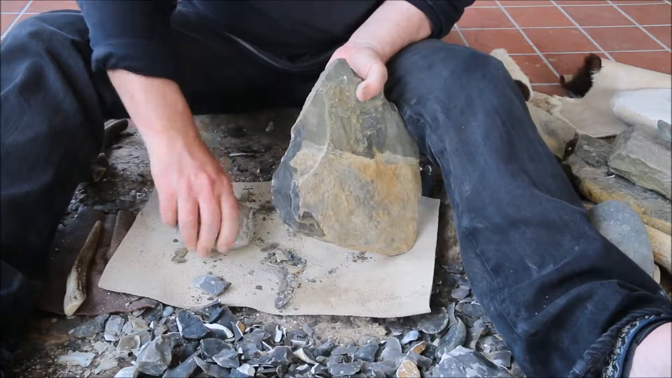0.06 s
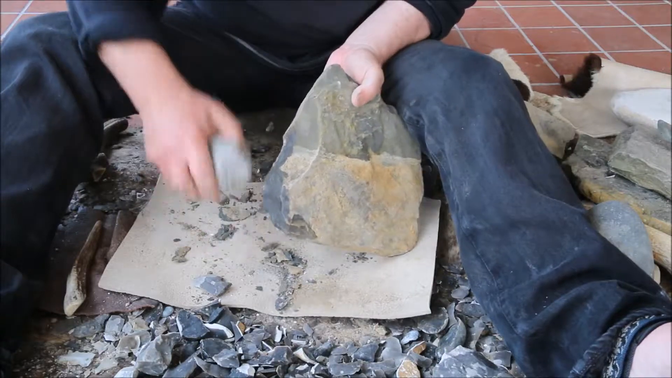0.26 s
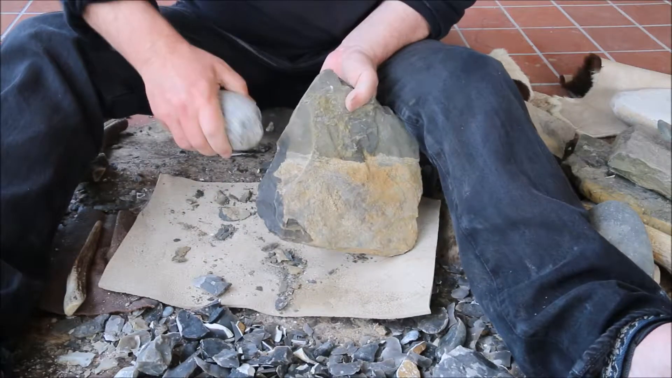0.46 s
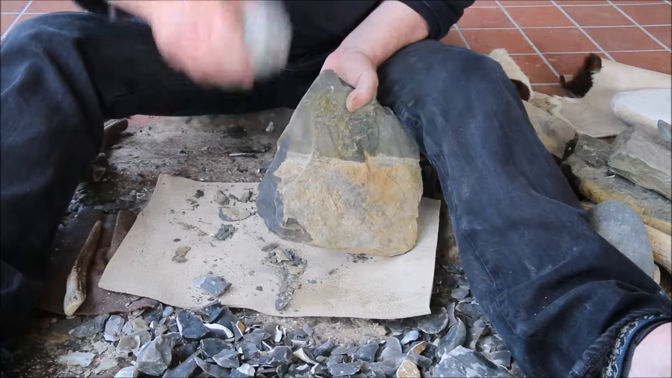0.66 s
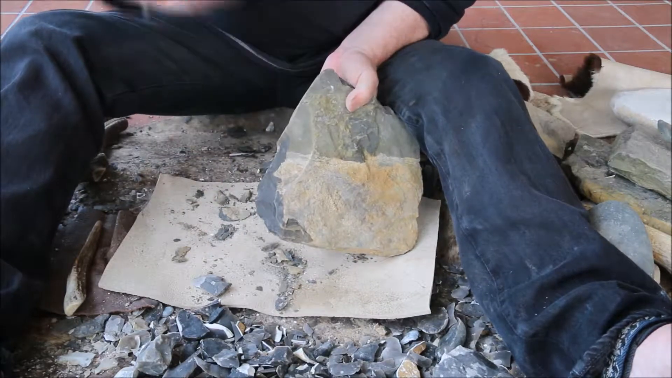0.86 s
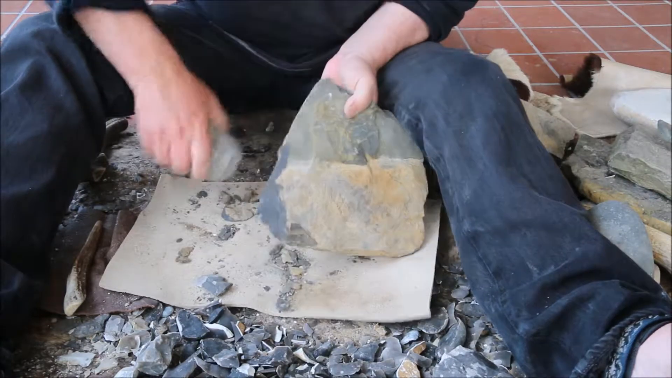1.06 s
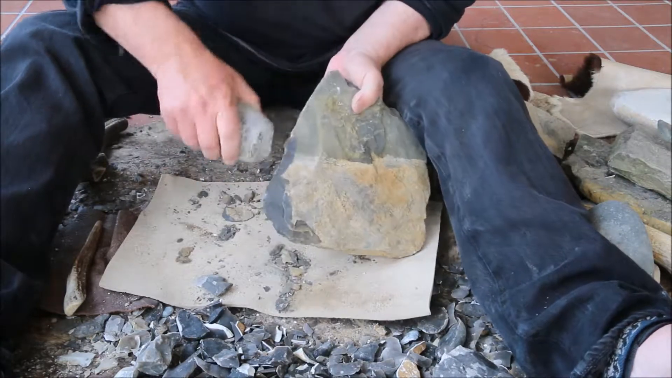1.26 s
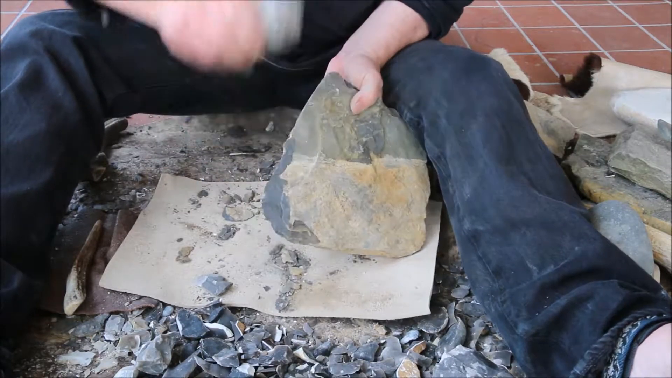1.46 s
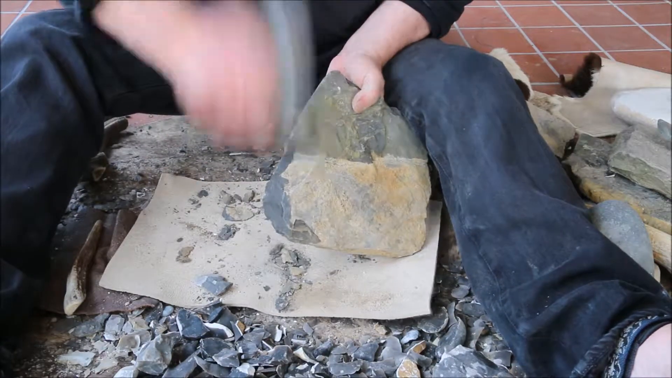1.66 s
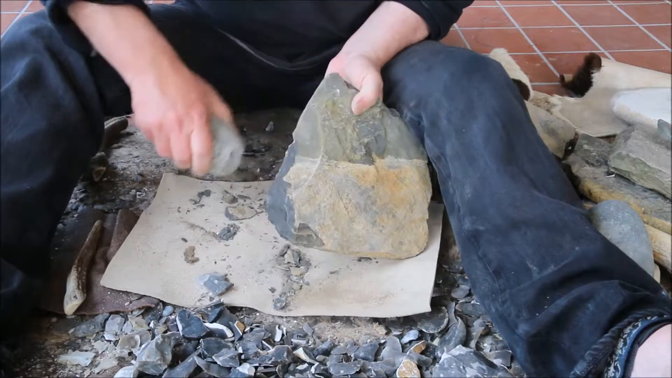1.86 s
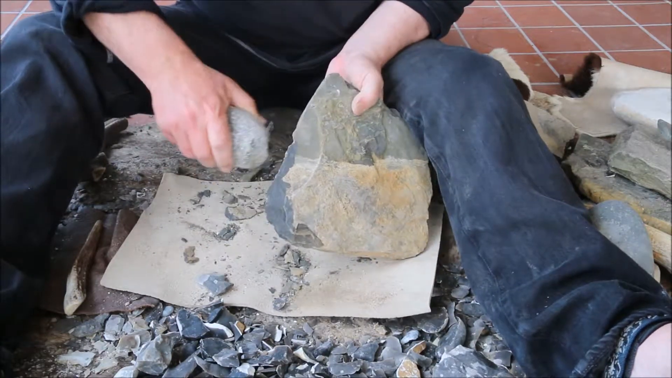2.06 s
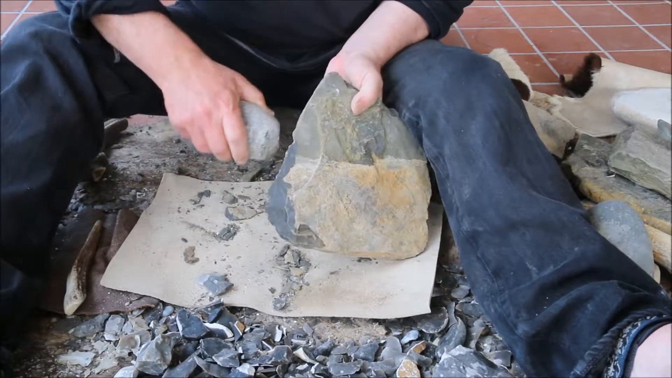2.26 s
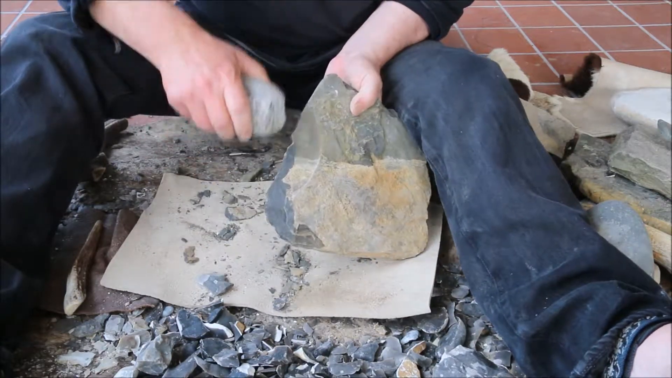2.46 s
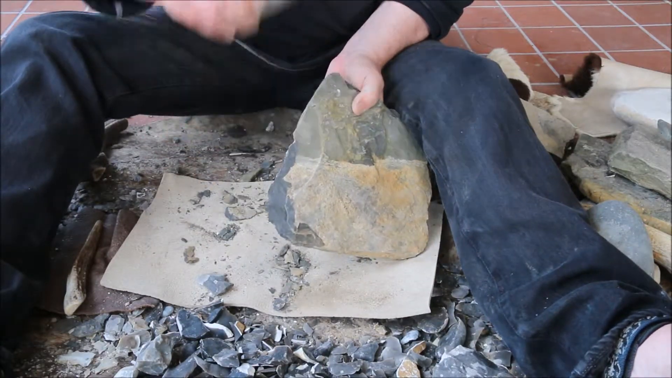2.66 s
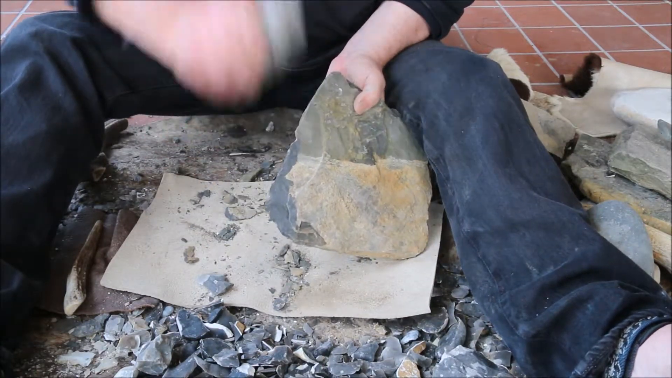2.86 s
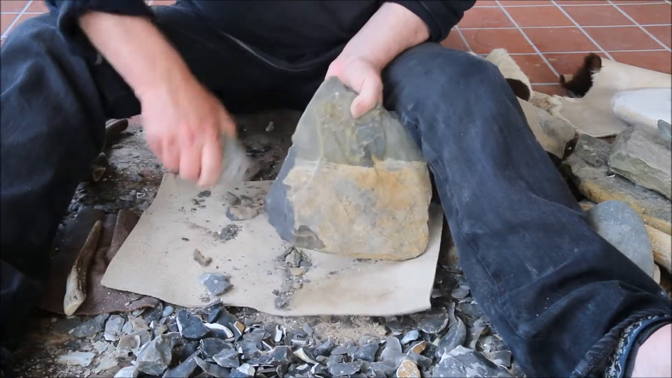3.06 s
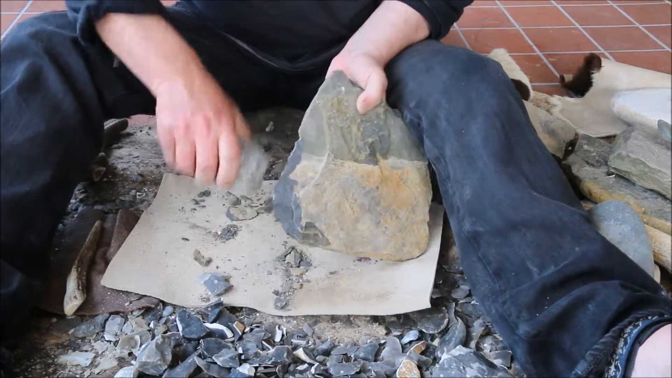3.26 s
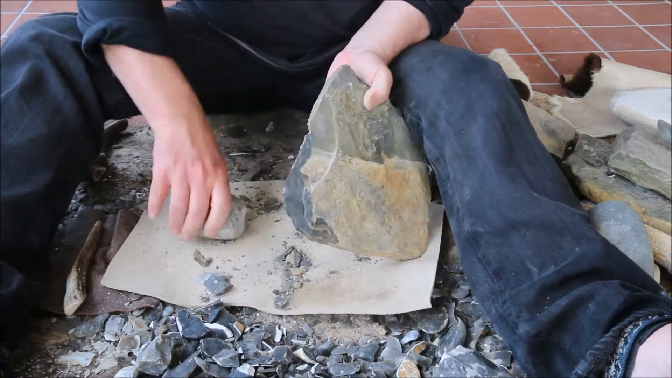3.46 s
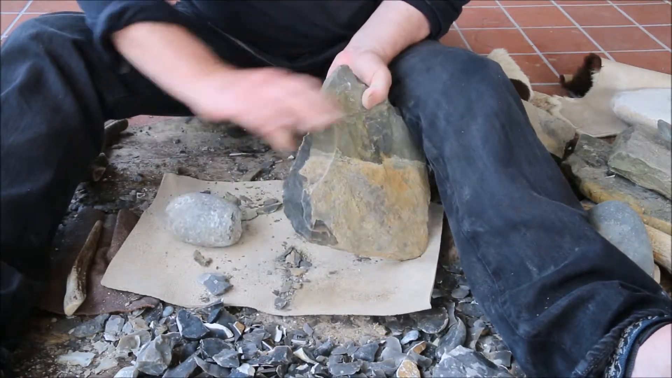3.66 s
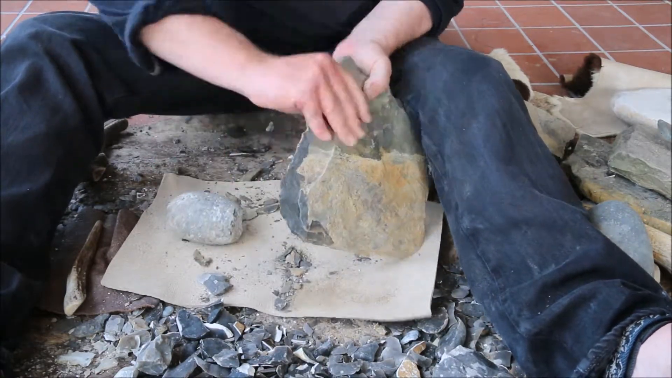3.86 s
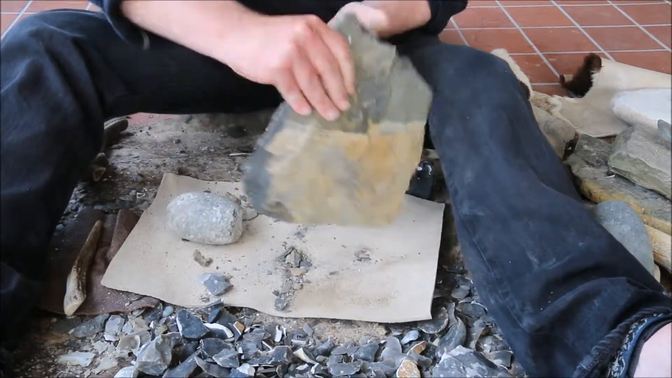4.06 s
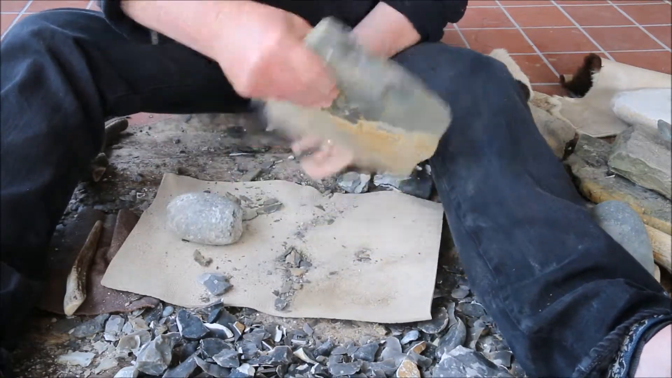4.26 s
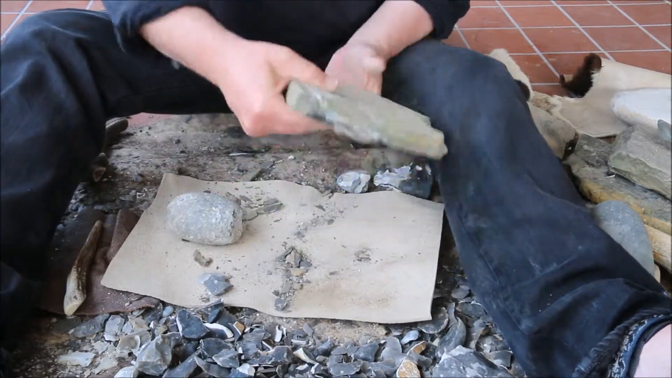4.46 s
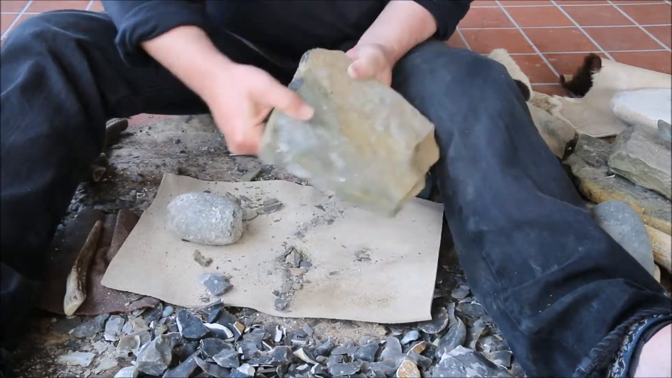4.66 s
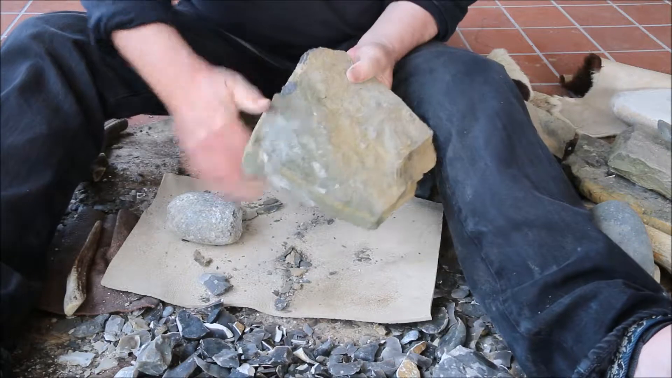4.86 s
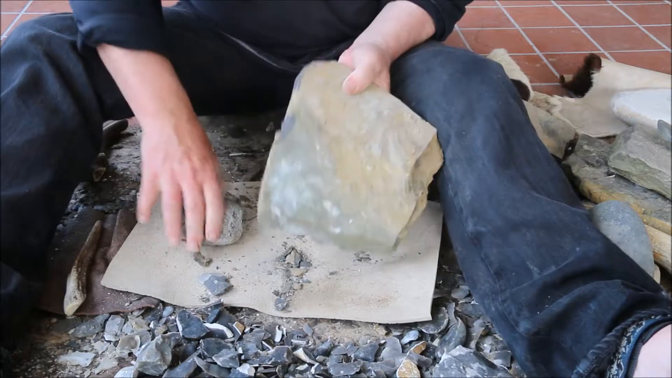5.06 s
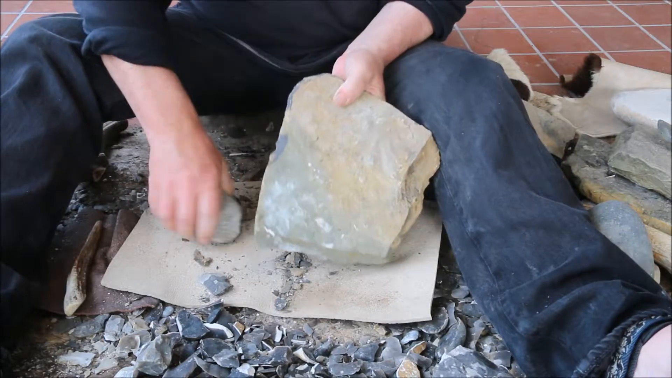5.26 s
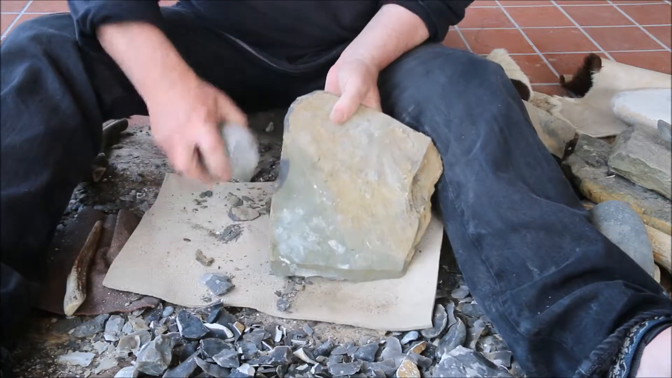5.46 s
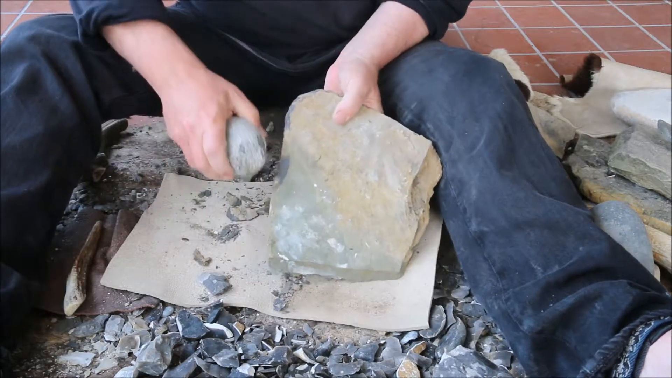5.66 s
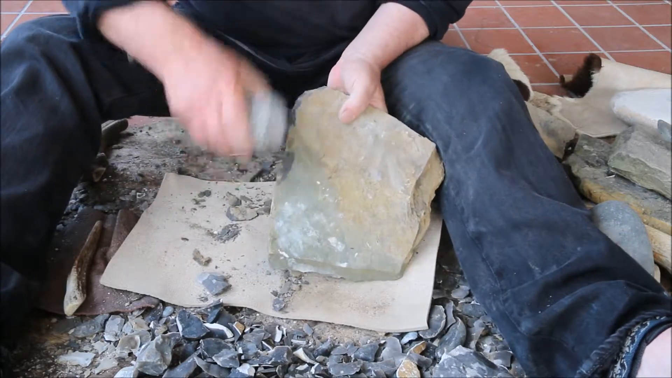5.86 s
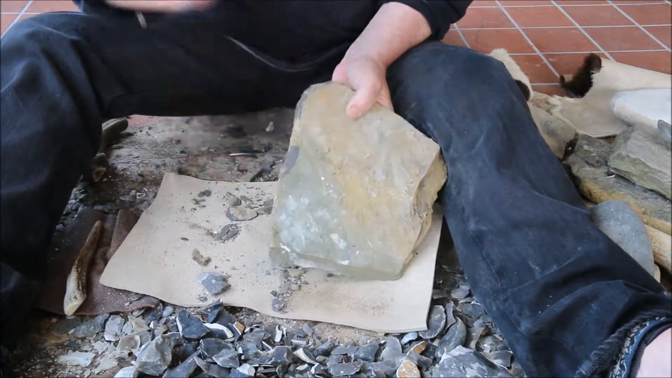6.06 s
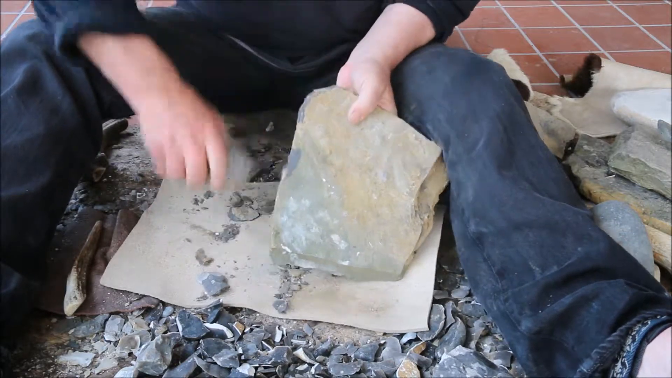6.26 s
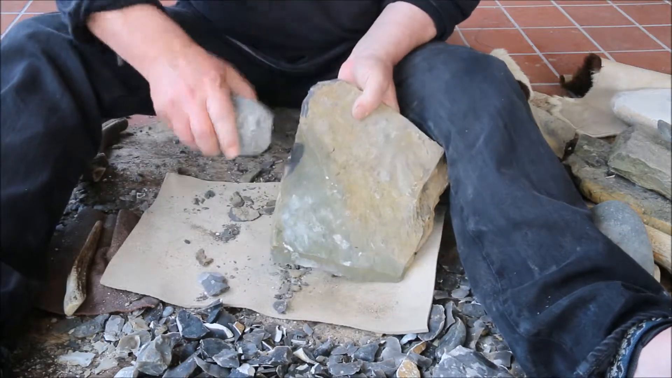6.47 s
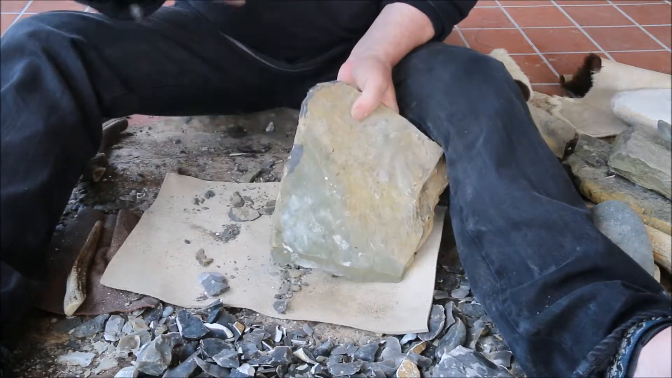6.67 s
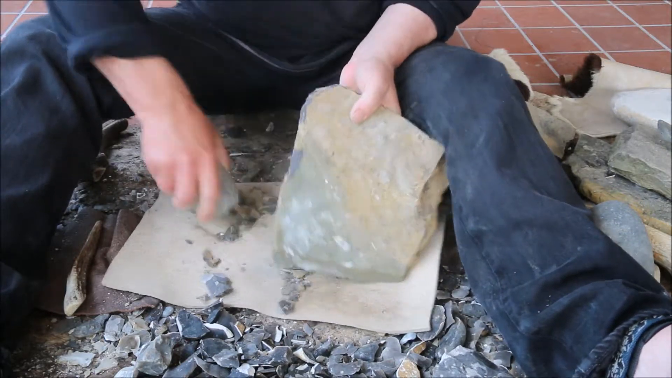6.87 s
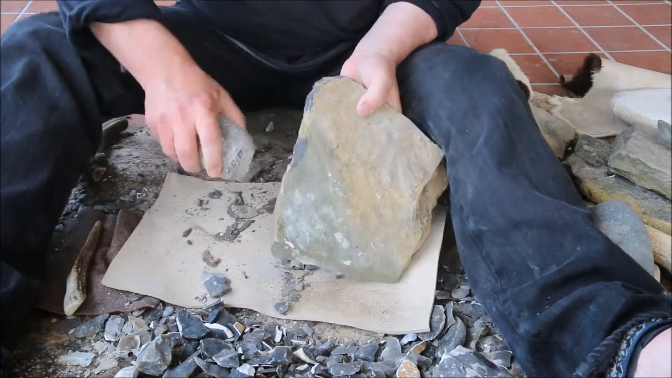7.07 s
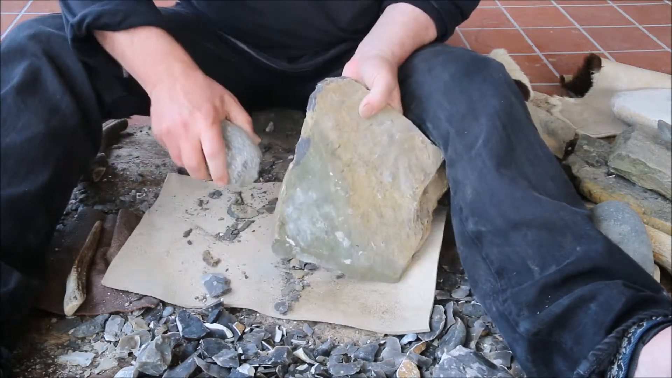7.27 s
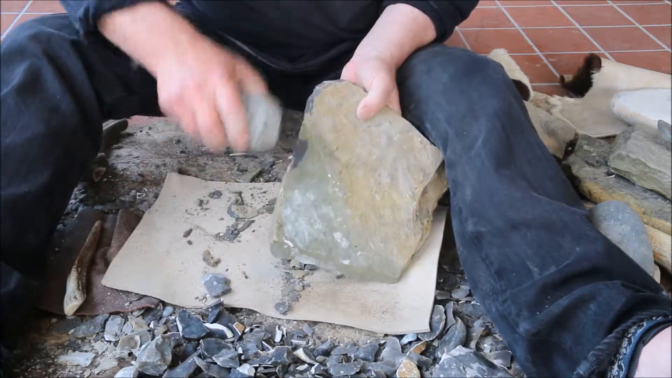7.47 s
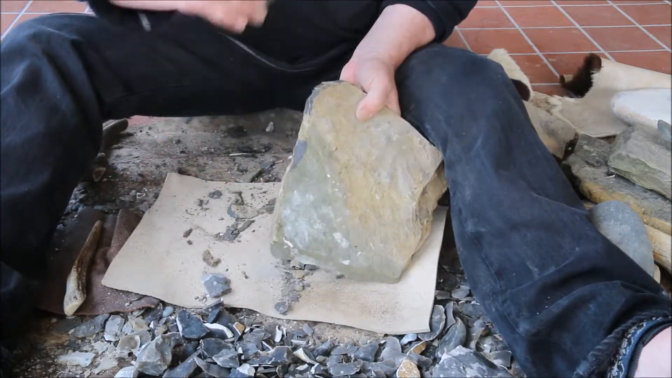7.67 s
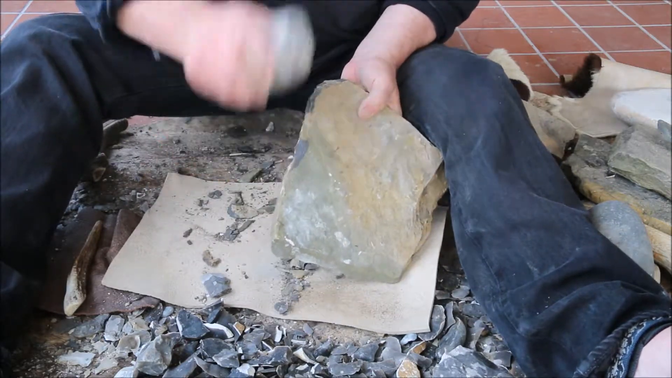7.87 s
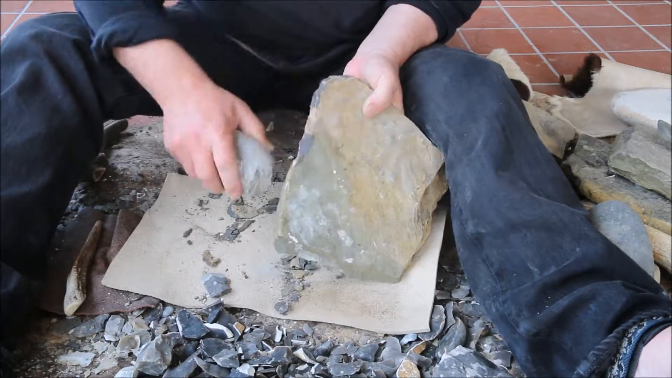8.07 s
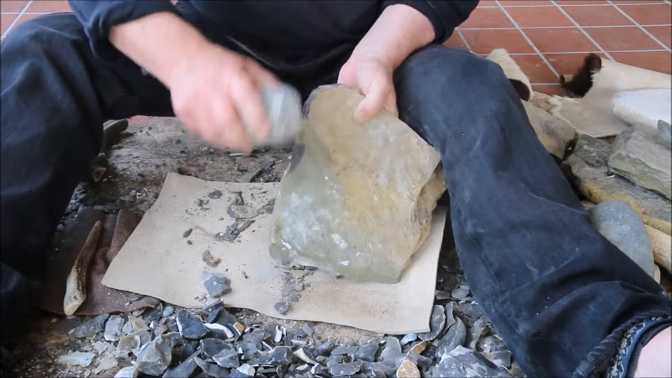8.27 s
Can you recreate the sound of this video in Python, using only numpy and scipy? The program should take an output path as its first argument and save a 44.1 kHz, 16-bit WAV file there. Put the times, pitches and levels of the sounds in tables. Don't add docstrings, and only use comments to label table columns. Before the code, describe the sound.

In a hard tiled room, a hammerstone strikes the edge of a hand-held stone slab: three sharp, briefly ringing cracks, then a gritty crunch as the hammer is set down. Hands and cloth rub while the slab is turned, with chips ticking and dull knocks on the mat, before two more cracks. Close microphone, overloaded on the blows, with lively echoes over faint room air and a thin high whine.

```python
import sys
import numpy as np
from scipy import signal
from scipy.fft import rfft, irfft
from scipy.io import wavfile
from scipy.ndimage import uniform_filter1d

SR = 44100
rng = np.random.default_rng(int(sys.argv[2]) if len(sys.argv) > 2 else 0)


def ratio(d):
    e = np.asarray(d, float) / 20
    return 10 ** e


def master(y):
    cut = np.clip(np.atleast_2d(y).T, -1, 1)
    pcm = np.round(cut * 32767)
    wavfile.write(sys.argv[1], SR, pcm.astype(np.int16))


N = 367353


def evened(x):
    return x / np.sqrt(np.mean(x ** 2) + 1e-20)


def read(points, hz):
    f, value = np.transpose(points)
    return np.interp(np.log(hz + 1), np.log(f + 1), value)


def add(mix, s, sound):
    part = mix[round(s * SR):][:len(sound)]
    part += sound[:len(part)]


def fade(s):
    start, bend = ratio(-23.5), 1.1
    return start + (1 - start) * (s * SR / N) ** bend


def unfaded(db, s):
    return ratio(db) / fade(s)


def causal(gain, smear=0.):
    half, log_gain = len(gain) // 2 + 1, np.log(gain + 1e-9)
    hz = np.linspace(0, SR / 2, half)
    delay = smear * np.interp(hz, np.linspace(0, SR / 2, 120), rng.random(120) ** 2)
    minimum_phase = signal.hilbert(log_gain).imag[:half]
    phase = minimum_phase + 2 * np.pi * np.cumsum(delay) * hz[1]
    return irfft(np.exp(log_gain[:half] - 1j * phase))[:half - 1]


def click(points, smear=0.):
    hz = abs(np.fft.fftfreq(4096, 1 / SR))
    return causal(ratio(read(points, hz)), smear)


def ring(hz, t60, t, phase=0.):
    return ratio(-60 * t / t60) * np.sin(2 * np.pi * (hz * t + phase))


# frequency in Hz, likeness from 0 to 1.
LIKENESS = [(50, 0.86), (500, 0.84), (1500, 0.48), (5000, 0.13), (9000, 0.1), (15000, 0.19)]


def noise(gain, patchy_db):
    hz = np.fft.rfftfreq(512, 1 / SR)
    a, b, c, d, patches = rng.standard_normal((N // 128 + 5, 257, 5)).T
    patches = evened(uniform_filter1d(uniform_filter1d(patches, 8, 0), 16, 1))
    same = np.clip(read(LIKENESS, hz), -1, 1)[:, None]
    left = a + 1j * b
    right = same * left + np.sqrt(1 - same ** 2) * (c + 1j * d)
    z = np.array([left, right]) * gain(hz)[:, None] * ratio(patchy_db * patches)
    return evened(signal.istft(z, nperseg=512, noverlap=384)[1][:, :N])


# frequency in Hz, level in dB per Hz.
AIR_COLOUR = [(59, -24.5), (100, -7), (257, 2), (297, 1.5), (502, -4.5), (674, -3.5), (885, -2.5),
              (1190, -3.5), (11400, -12.5), (15000, -16)]


def still_air():
    colour = AIR_COLOUR + [(15450, -30)]
    return ratio(-61.5) * noise(lambda hz: ratio(read(colour, hz)), patchy_db=.4)


def rumble():
    centre_hz, width_hz, level_db = 55.3, 17, -76
    hz = np.fft.rfftfreq(N, 1 / SR)
    a, b = rng.standard_normal((2, N))
    hump = 1 / (1 + ((hz - centre_hz) / width_hz) ** 4)
    drone = evened(irfft(rfft([a, a + .35 * b]) * hump, N))
    return ratio(level_db) * ratio([[-1.5], [1.5]]) * drone


def electric_whine():
    return ratio(-68.5) * np.sqrt(2) * np.sin(2 * np.pi * 15591.6 * np.arange(N) / SR)


# start in seconds, peak in dB, pitch in Hz, t60 in seconds.
CHIP_TICKS = [(0.1122, -47, 3330, 0.013), (0.34, -65, 3250, 0.011), (0.889, -52, 3190, 0.004),
              (1.4538, -33.5, 5160, 0.023), (3.265, -37, 4330, 0.04), (3.4944, -61.5, 2810, 0.03),
              (3.64, -45, 2840, 0.012), (3.6479, -36, 2700, 0.019), (3.6515, -43, 3410, 0.012),
              (3.6971, -33, 3200, 0.021), (4.9314, -45, 3320, 0.01), (5.1344, -48.5, 2950, 0.01),
              (5.254, -41.5, 3940, 0.01), (5.497, -38, 3670, 0.008), (5.6317, -51.5, 3440, 0.0079),
              (5.7455, -56.5, 2800, 0.026), (6.291, -38.5, 9140, 0.013), (0.2185, -59, 11000, 0.006)]


def chips():
    out, t = np.zeros(N), np.arange(2048) / SR
    for s, db, hz, t60 in CHIP_TICKS:
        colour = [(0.18 * hz, -34), (0.3 * hz, -12), (hz, 0), (1.4 * hz, -6), (3.4 * hz, -24), (7 * hz, -40)]
        tick = click(colour, smear=0.002)
        add(out, s + .001, unfaded(db, s) * (tick / abs(tick).max() + .2 * ring(hz, t60, t)))
    return out


# start in seconds, peak in dB, body pitch in Hz, relative tick in dB,
# t60 in seconds.
MAT_KNOCKS = [(0.131, -53.5, 700, -13, 0.03), (0.136, -50.5, 977, -21.5, 0.071),
              (0.216, -56, 414, -27, 0.05), (0.597, -69, 520, -4, 0.03), (3.264, -38, 590, -26, 0.026),
              (4.056, -27.5, 650, -20.5, 0.026), (5.01, -53, 570, -11, 0.032),
              (5.26, -40.5, 752, -23, 0.055), (5.486, -36.5, 457, -11.5, 0.048),
              (5.512, -43, 432, -18.5, 0.04), (5.649, -46, 550, -9, 0.027), (5.811, -36, 540, -15, 0.033),
              (6.151, -45, 446, -18.5, 0.015)]


def knocks():
    out, t = np.zeros(N), np.arange(2048) / SR
    for s, db, hz, tick_db, t60 in MAT_KNOCKS:
        colour = [(30, -30), (0.49 * hz, -12), (hz, 0), (1.9 * hz, -10), (4500, tick_db - 11.5),
                  (16000, tick_db - 25)]
        push = click(colour, smear=0.003995)
        body = 0.65 * ring(hz, t60, t) * np.minimum(t / 0.00087, 1)
        add(out, s + 0.0043, unfaded(db, s) * (push / abs(push).max() + body))
    return out


# frequency in Hz, level in dB per Hz.
SHUFFLE_COLOUR = [(59, -59.5), (100, -21), (360, -2.5), (755, -5), (909, -10.5), (982, -5.5), (1610, -16.5),
                  (4000, -19.5), (5200, -49.5), (8800, -120)]
# frequency in Hz, level in dB per Hz.
GRIT_COLOUR = [(880, -34), (1500, -3.5), (2190, -3), (5020, -5), (6630, -7), (11900, -14), (14900, -19.5),
               (16000, -30)]
# frequency in Hz, width in Hz, level in dB.
RUB_MODES = [(1785, 80, -5.5), (2204, 300, 3), (3306, 50, 6), (4660, 150, -3.5)]
# firmest contact in seconds, rise in seconds, fall in seconds,
# shuffle in dB, relative grit in dB.
HAND_STROKES = [(.14, 0.073, 0.17, -69.5, 1.5), (0.34, 0.011, 0.07, -80.5, 12), (.62, 0.29, 0.3, -80, -5),
                (.89, 0.065, .06, -68, -3), (.95, 0.071, 0.11, -64, -9), (2.4, 0.17, 1, -76.5, 4.5),
                (3.83, 0.033, 0.44, -69, 10.5), (4.04, 0.14, 0.047, -48.5, 3), (4.07, 0.059, 0.11, -45, -6),
                (4.48, 0.29, 0.21, -69.5, 7), (4.68, 0.32, 0.27, -63, 5.5), (4.78, 0.057, 0.22, -74, 15),
                (4.935, 0.031, 0.055, -73, 15.5), (5.028, 0.055, 0.078, -62, 6), (5.18, .1, 0.23, -68, 3.5),
                (5.265, 0.061, 0.145, -62.5, 4.5), (5.495, 0.045, 0.18, -47, -3),
                (5.64, 0.15, 0.49, -56, -6.5), (5.823, .015, 0.068, -52, -14), (5.999, 0.32, .4, -61.5, -3),
                (6.06, 0.048, .06, -71, 12), (7.7, .1, 0.073, -95, 16), (8.02, .2, 0.27, -63.5, -18),
                (8.3, .3, 0.25, -64, 0.5)]
# start in seconds, length in seconds, level in dB.
PALM_SLIDES = [
    (0.442, 0.4, -81.5),
    (2.3, 0.32, -72),
    (3.814, 0.34, -61),
    (4.203, 0.54, -69),
    (4.848, 0.13, -63),
    (5.183, 0.31, -67.5),
    (5.84, 0.13, -62),
    (7.786, 0.85, -67),
]


def handling():
    t = np.arange(0, N + 64, 64) / SR
    powers = np.zeros((3, len(t)))
    for s, rise, fall, db, grit_db in HAND_STROKES:
        away = np.maximum((s - t) / rise, (t - s) / fall)
        stroke = unfaded(db - 20 * away, t)
        powers[:2] += [stroke ** 2, (ratio(grit_db) * stroke) ** 2]
    for s, length, db in PALM_SLIDES:
        edge = np.clip(np.minimum(t - s, s + length - t) / .05, 0, 1)
        powers[2] += (edge * unfaded(db, t)) ** 2
    levels = [np.interp(np.arange(N) / SR, t, level) for level in np.sqrt(powers)]
    shuffle = noise(lambda hz: ratio(read(SHUFFLE_COLOUR, hz)), patchy_db=1.0)
    grains = ratio(2.2 * uniform_filter1d(rng.exponential(1, N), size=40) * 3)
    hiss = evened(grains * noise(lambda hz: ratio(read(GRIT_COLOUR, hz)), patchy_db=1.5))

    def resonances(hz):
        return sum(ratio(db) / (1 + (2 * (hz - f) / w) ** 2) for f, w, db in RUB_MODES)

    rub = noise(resonances, patchy_db=3)
    return levels[0] * shuffle + levels[1] * hiss + levels[2] * rub


# start in seconds, strength in dB, then crack colour in dB at the three CRACK_BANDS.
HAMMER_BLOWS = [
    (.9742, 21.8, -29.5, -39.5, -41.5),
    (1.7212, 7.7, -15, -19.5, -19),
    (2.9538, 3.6, -19.5, -25.5, -33.5),
    (6.2163, 5.4, -16, -28.5, -44.5),
    (6.8467, 9.9, -26.5, -24.5, -29),
]
CRACK_BANDS = (1250, 2900, 8000)
# t60 in seconds, then level in dB for each of the five blows, set by where it lands.
SLAB_MODES = [(0.042, -34, -26.5, -32, -18, -44.5), (0.058, -10.5, -6.5, -41, 4, -10),
              (0.03, -4, 2.5, -0.5, 4, 1), (0.031, -67, -6.5, -12, -24, -21),
              (0.026, -22.5, -17.5, -7, -38, -44), (0.015, -15, 4, -8.5, -10, 1.5),
              (0.019, -41, -40.5, -24.5, -28.5, -15.5), (0.01, -29, -5, -14, -46, -16),
              (0.0099, -61.5, -10, -19.5, -44.5, -21), (0.014, -30.5, -19, -9, -45.5, -15.5),
              (0.022, -56, -42, -33, -42.5, -30), (0.0045, -61.5, -62.5, -35, -43.5, -45),
              (.012, -56.5, -45.5, -27, -64.5, -38), (0.0087, -20.5, -0.5, -44.5, 0, -6.5)]
MODE_HZ = (1000, 1848, 2135, 3285, 4340, 4625, 5590, 6990, 8340, 9420, 10600, 11900, 14400, 2225)


def blows():
    near, far, t = np.zeros(N), np.zeros(N), np.arange(4096) / SR
    contact = np.minimum(t / 0.00055, 1)
    spread = np.sin(np.pi / 2 * np.minimum(t / 0.0013, 1)) ** 2
    sideways = ratio(-25)
    for k, (s, strength_db, *colour_db) in enumerate(HAMMER_BLOWS):
        modes = []
        for m, row in enumerate(SLAB_MODES):
            sign = (-1) ** max(m, 2)
            modes.append(sign * ratio(row[1 + k]) * contact * ring(MODE_HZ[m], row[0], t))
        low, high = colour_db[0], colour_db[-1]
        colour = [(40, low - 34), (170, low - 8.5), (550, low)]
        colour += list(zip(CRACK_BANDS, colour_db)) + [(20000, high - 20.5)]
        crack = 60 * click(colour, smear=0.001108)
        add(near, s, ratio(strength_db) * (sum(modes) + (sideways - 1) * modes[1]))
        add(near, s, ratio(strength_db + 2.0) * crack)
        parts = [spread * mode for mode in modes] + [crack]
        power = sum(abs(np.fft.fft(part, 8192)) ** 2 for part in parts)
        add(far, s, ratio(strength_db) * causal(np.sqrt(power), smear=.0015))
    return near, far


# frequency in Hz, level in dB per Hz.
SET_DOWN_COLOUR = [(24, -44), (40, -26), (321, -9), (355, -7), (443, -8.5), (866, -6.5), (980, -7.5),
                   (1350, -12.5), (2390, -14), (15000, -42)]


def hammer_set_down():
    out, s = np.zeros(N), 3.4425
    crunch = click(SET_DOWN_COLOUR, smear=.009)
    add(out, s, unfaded(-16, s) * crunch / abs(crunch).max())
    return out


# frequency in Hz, t60 in seconds.
ROOM_DECAY = [(150, 0.49), (500, 0.71), (1000, 0.76), (2000, 0.74), (4500, 0.73), (9000, 0.54),
              (15000, 0.33)]
# delay in seconds, level in dB.
WALL_ECHOES = [(.0045, -14), (.0112, -6), (.0145, -10), (.0175, -13), (.0228, -8), (.0275, -13),
               (.0345, -11)]


def room(x, tail_db=2.5):
    taps = np.zeros((2, SR))
    at = np.arange(200, SR - 20, 20) + rng.integers(0, 20, (2, (SR - 201) // 20))
    np.put_along_axis(taps, at, rng.choice([-1., 1.], at.shape), 1)
    hz, t, z = signal.stft(taps, SR, nperseg=256)
    same = np.clip(read(LIKENESS, hz) ** 1.1, 0, 1)[:, None]
    z[1] = same * z[0] + np.sqrt(1 - same ** 2) * z[1]
    decay = ratio(-60 * t / read(ROOM_DECAY, hz)[:, None])
    tail = signal.istft(z * decay, SR, nperseg=256)[1][:, :SR]
    tail *= np.minimum(np.arange(SR) / SR / 0.006, 1)
    tail *= ratio(tail_db) / np.linalg.norm(tail[0])
    for k, (s, db) in enumerate(WALL_ECHOES):
        wall = ratio(db) * click([(100, -11.0), (3000, 0.5), (9000, -7.0), (20000, -15.5)], smear=0.0012)
        for port, lead in zip(tail, (3, -3)):
            add(port, s + lead * (k % 3 - 1) / SR, wall)
    return signal.fftconvolve(x[None], tail, axes=1)[:, :N]


# frequency in Hz, level in dB.
EDGE_COLOUR = [(30, 1), (300, -10.5), (1000, -7), (2200, 5.5), (5000, 1.5), (9000, 0.5), (14000, 3)]


def port_difference(direct):
    side = ratio(-18) * signal.oaconvolve(direct, click(EDGE_COLOUR, smear=0.0013))[:N]
    return np.array([side, -side])


def scene():
    background = still_air() + rumble() + electric_whine()
    small = chips() + knocks() + hammer_set_down()
    hands = handling()
    near, far = blows()
    wet = room(far + ratio(-3.5) * small + ratio(-7.5) * hands.mean(0))
    return port_difference(near + small) + near + small + hands + wet + background


def limiter(dry):
    t = np.arange(N) / SR
    quick = np.exp(-1 / (0.012 * SR))
    power_db = 10 * np.log10(signal.lfilter([1 - quick], [1, -quick], (dry ** 2).mean(0)) + 1e-12)
    fall = 110 * t
    held_db = np.maximum.accumulate(power_db + fall) - fall
    over_db = np.maximum(held_db + 21.0, 0)
    lag = np.exp(-1 / (0.002 * SR))
    return dry / ratio(0.97 * signal.lfilter([1 - lag], [1, -lag], over_db))


# frequency in Hz, level in dB.
MIC_COLOUR = [(20, 5.5), (14800, 0.5), (15800, 0.5), (16400, -4.5), (22050, -43.5)]


def microphone(x):
    return signal.oaconvolve(x, click(MIC_COLOUR)[None])[:, :N]


def low_pass(x):
    return signal.sosfilt(signal.butter(12, 17030, fs=SR, output="sos"), x)


def record(dry):
    limited = limiter(dry)
    ceiling = .8
    clipped = limited / (1 + abs(limited / ceiling) ** 6) ** (1 / 6)
    heard = microphone(clipped)
    return low_pass(heard * fade(np.arange(N) / SR))


dry = scene()
out = record(dry)
master(out)
```